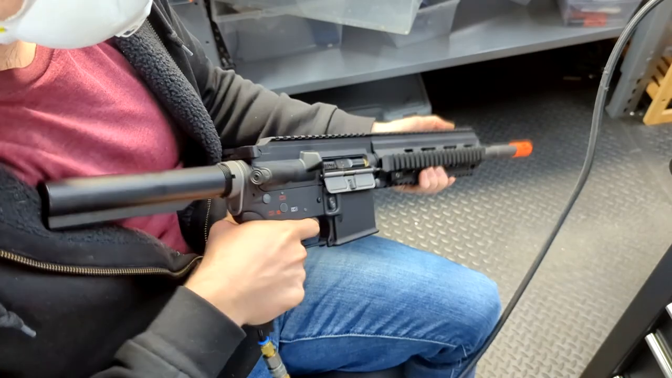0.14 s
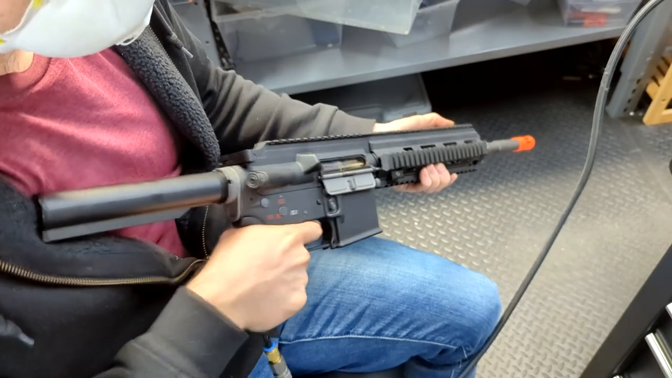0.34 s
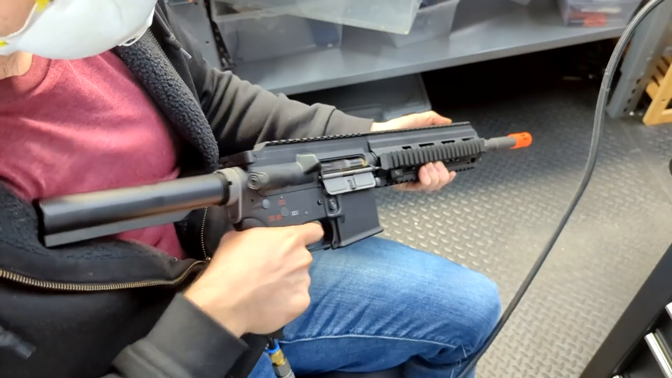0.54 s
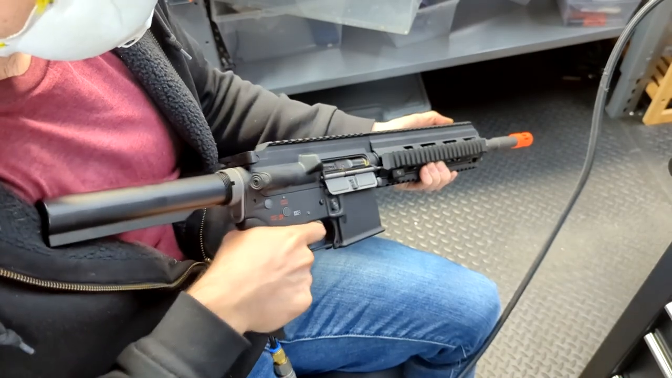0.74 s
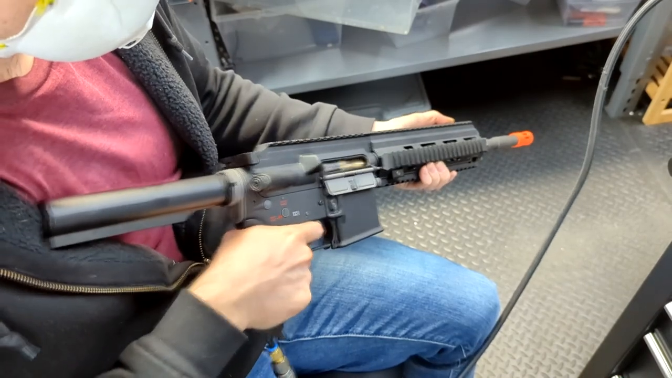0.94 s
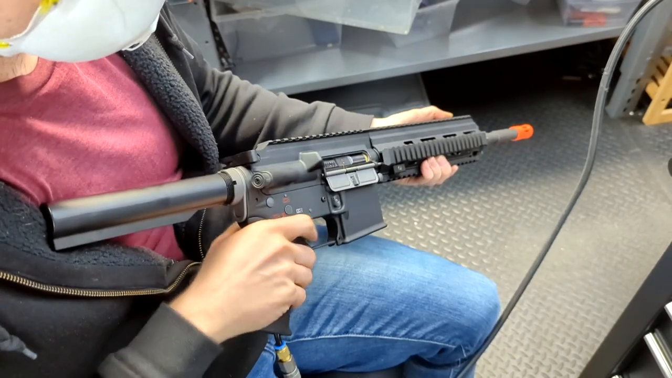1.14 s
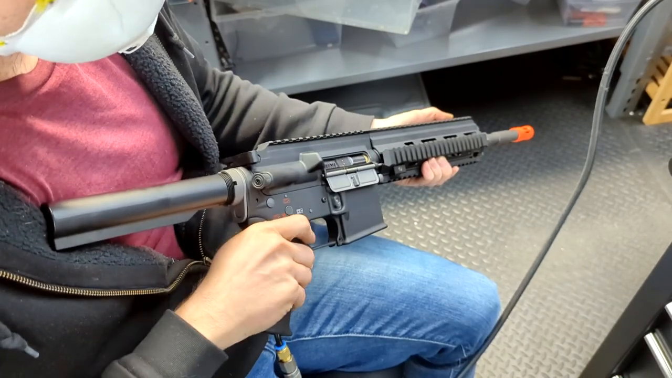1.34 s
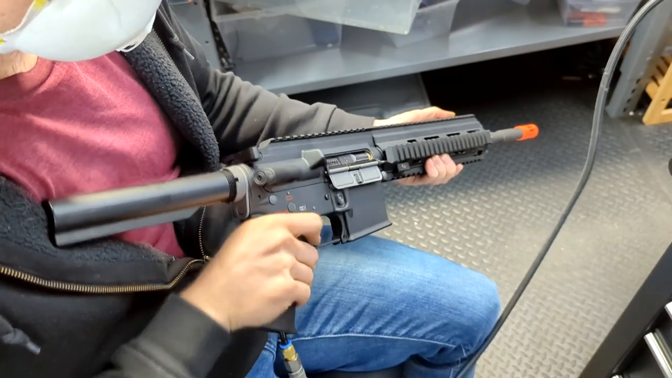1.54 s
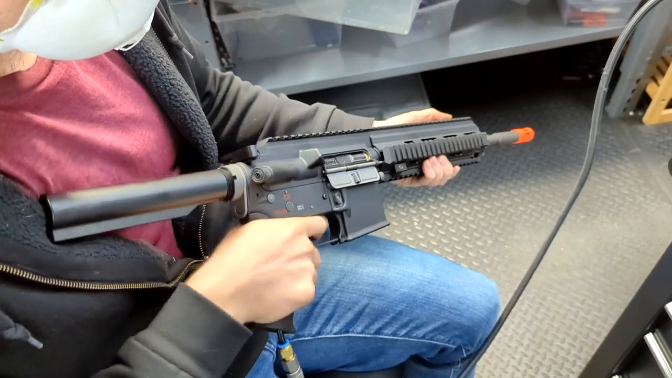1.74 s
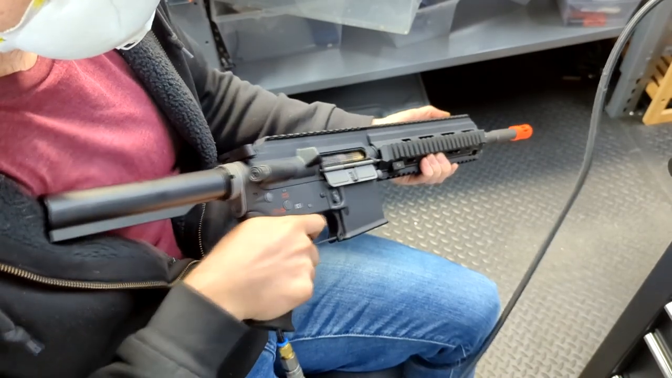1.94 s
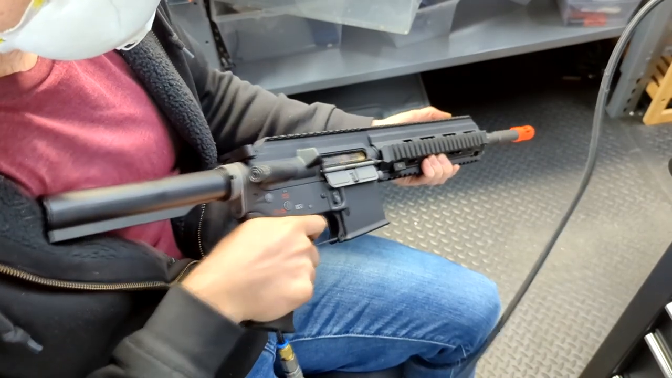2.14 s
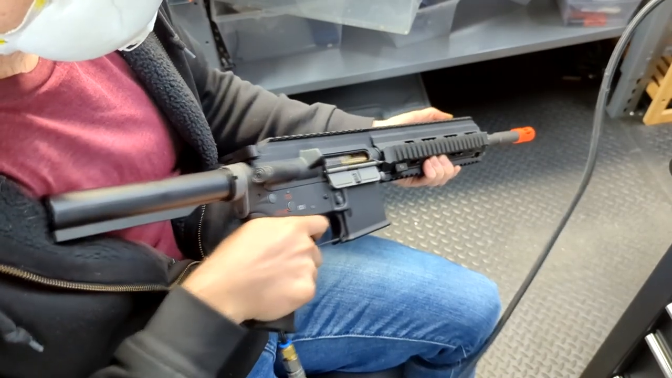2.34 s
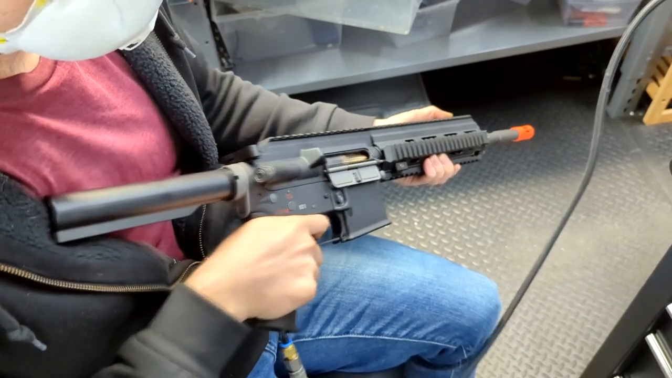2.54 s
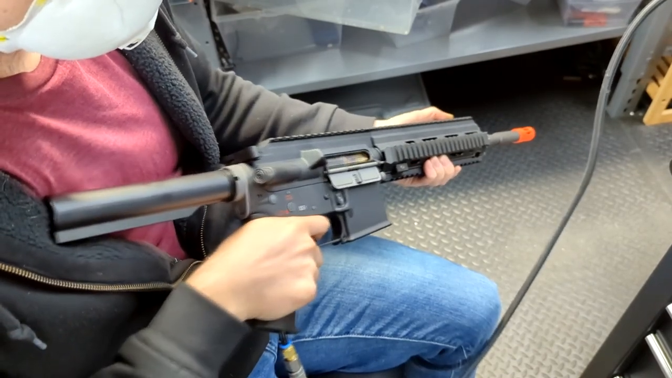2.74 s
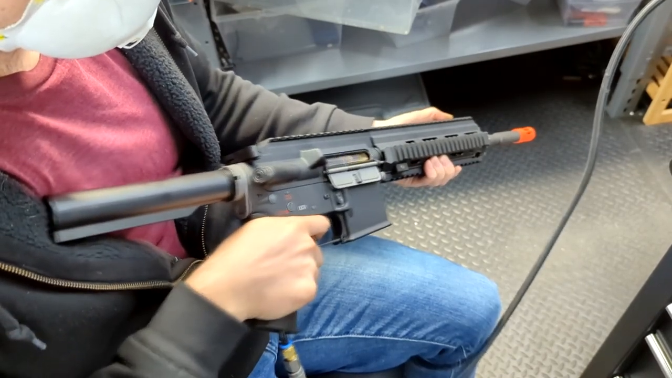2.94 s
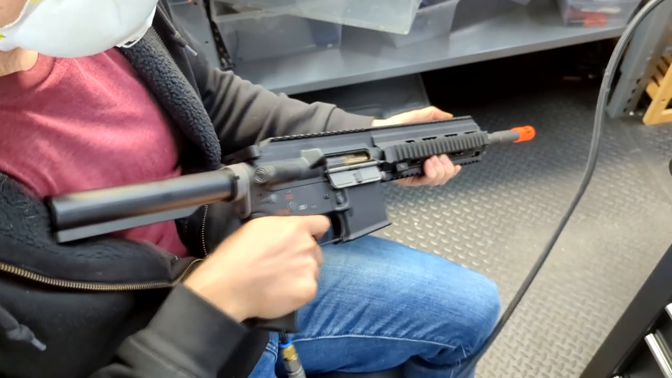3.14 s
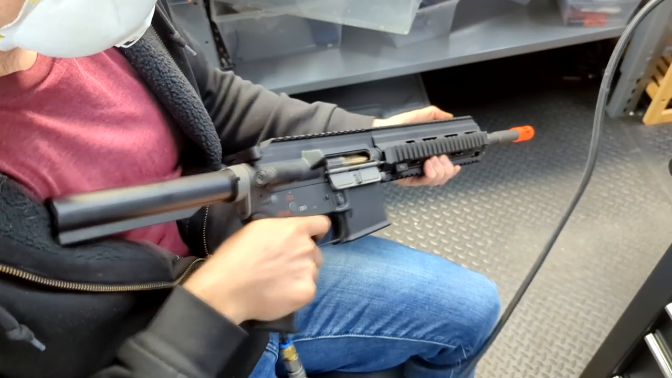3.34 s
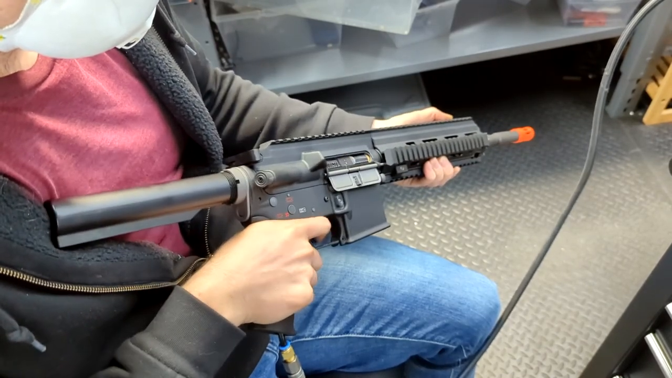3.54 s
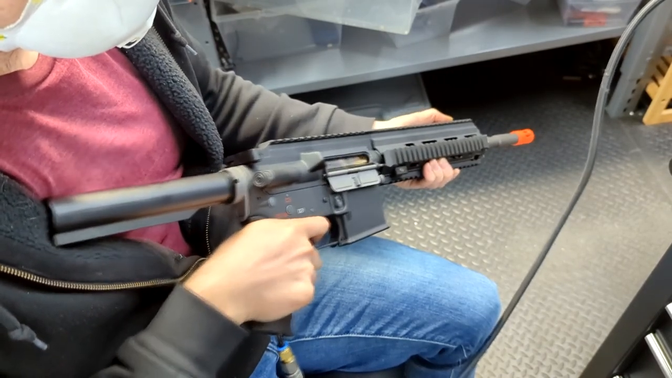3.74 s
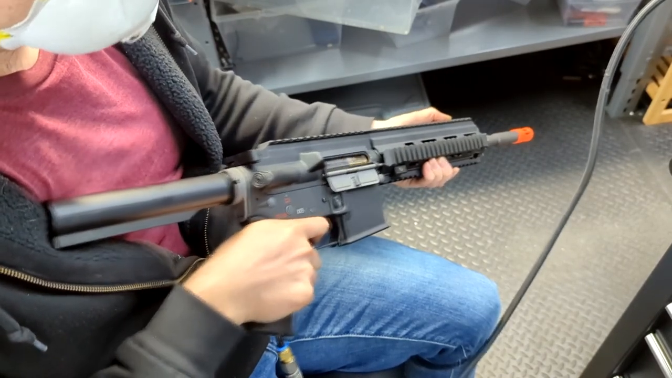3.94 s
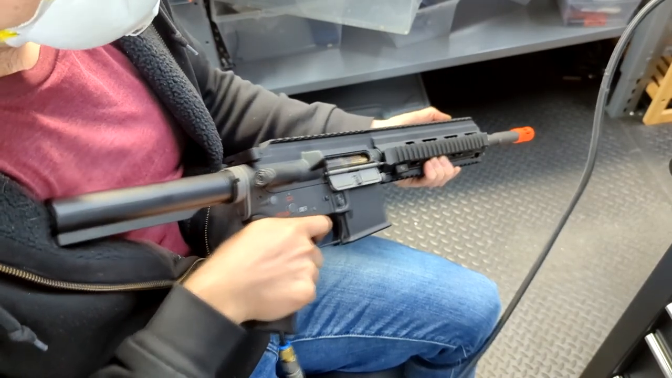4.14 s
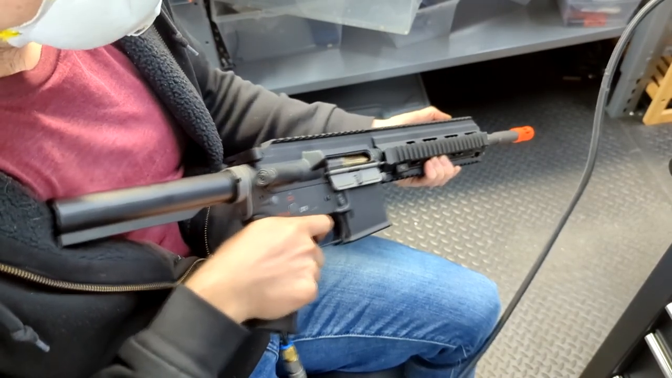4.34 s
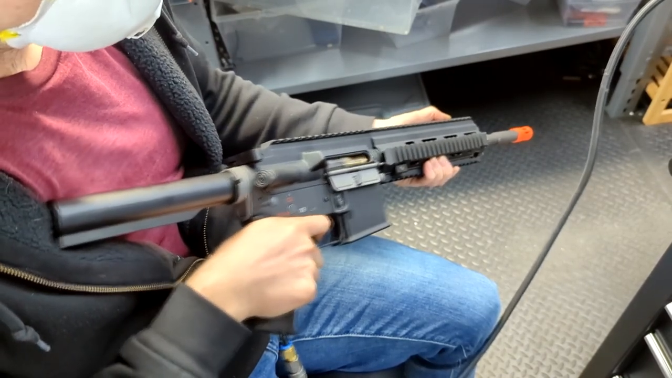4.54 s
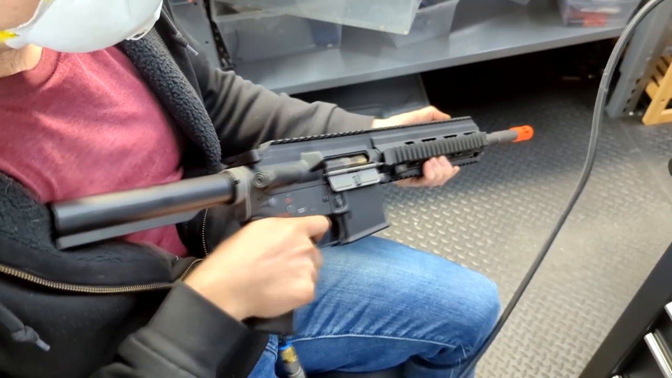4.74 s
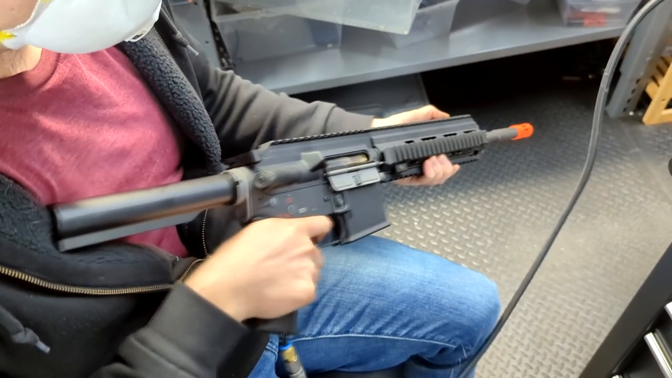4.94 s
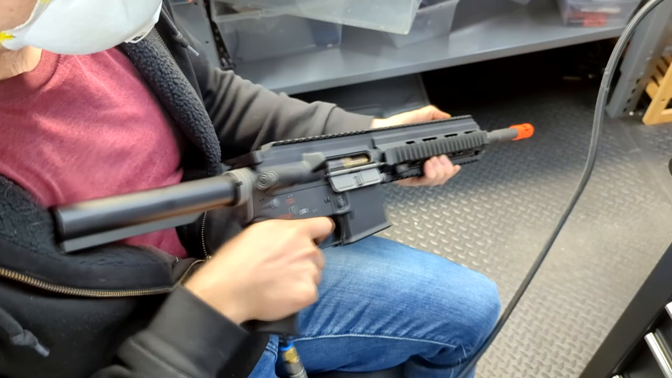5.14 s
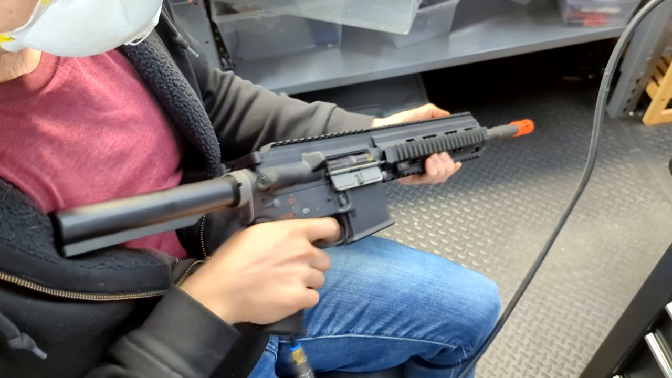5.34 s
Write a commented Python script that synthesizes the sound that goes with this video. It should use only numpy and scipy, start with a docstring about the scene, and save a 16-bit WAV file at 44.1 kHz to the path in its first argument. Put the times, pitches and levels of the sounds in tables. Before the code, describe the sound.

Close to an air-driven airsoft rifle in a hard-surfaced workshop. After faint handling bumps and a click, five evenly spaced single shots crack out, each a bright pop with metallic slap and short hiss. A pause with small selector clicks follows, then two long automatic bursts at about sixteen shots per second, separated by a short gap. Compressed stereo sound keeps the loud bursts level.

```python
"""Five single shots from an air-driven airsoft rifle in a workshop, then two long automatic bursts.
Each shot is a valve tick, a muzzle pop with near echoes, the slap of the returning nozzle and dying hiss.
Shaped noise makes the air and the room, short low swings the thump, and fading sine waves the metal ring.
Trigger, selector and valve clicks, soft bumps and a steady rumble surround the shots.
The recorder's compressor evens out loud stretches; its limiter turns down just ahead of each pop."""
import sys
import numpy as np
from scipy import signal
from scipy.fft import rfft, irfft, next_fast_len
from scipy.io import wavfile
from scipy.ndimage import uniform_filter1d, minimum_filter1d

SR = 44100
rng = np.random.default_rng(int(sys.argv[2]) if len(sys.argv) > 2 else 0)


def dump(signal):
    """Clip the signal to [-1, 1] and save it as 16-bit WAV at the path in sys.argv[1]."""
    limited = np.clip(np.atleast_2d(signal).T, -1, 1)
    pcm = np.round(limited * 32767).astype(np.int16)
    wavfile.write(sys.argv[1], SR, pcm)


N = 237758
TAIL = SR // 2  # samples in one shot, click or room answer
LEAD_S = .016  # room before the pop, so the valve tick fits in


def amp(db):
    """Turn decibels into a plain multiplier."""
    return 10 ** (np.asarray(db) / 20)


def unit(x):
    """Scale a sound to an average (RMS) level of 1."""
    return x / np.sqrt(np.mean(x ** 2) + 1e-20)


def along(points, hz):
    """Read a curve of (f/Hz, value) points, with frequency on a log axis."""
    f, v = np.transpose(points)
    return np.interp(np.log(hz + 1), np.log(f + 1), v)


def filtered(x, response):
    """Make each frequency of x louder or softer by a response curve."""
    n = x.shape[-1]
    padded = next_fast_len(n + 8192)
    spectrum = rfft(x, padded) * response(np.fft.rfftfreq(padded, 1 / SR))
    return irfft(spectrum, padded)[..., :n]


def resonances(table, hz):
    """Add up smooth peaks from rows of (f/Hz, width/Hz, level/dB)."""
    return sum(amp(db) * w * w / (w * w + 4 * (hz - centre) ** 2) for centre, w, db in table)


def add(track, s, sound):
    """Mix a sound into the track from time s, cutting it off at the track's end."""
    part = track[:, round(s * SR):][:, :sound.shape[-1]]
    part += sound[..., :part.shape[-1]]


# how alike left and right are: f/Hz, likeness (1 = the same)
LIKENESS = [(30, .6), (60, 0.85), (180, 1), (550, 0.39), (1650, 0.07), (4970, 0.01), (9000, 0.095),
            (15000, 0.085)]


def spread(pair, colour):
    """Mix two unrelated signals into a coloured left-right pair, wider where the sides are less alike."""
    def mid_and_side(hz):
        turn = np.arccos(np.clip(along(LIKENESS, hz), 0, 1)) / 2
        return colour(hz) * [np.cos(turn), np.sin(turn)]

    mid, side = np.moveaxis(filtered(pair, mid_and_side), -2, 0)
    return np.stack([mid + side, mid - side], -2)


# how long the room's main answer takes to fade by 60 dB: f/Hz, t60/s
ROOM_FADE = [(200, 0.33), (530, 0.23), (1390, 0.26), (3680, 0.3), (9700, 0.22), (15000, 0.22)]


def tails(count):
    """Room answers: each frequency dies at its own speed; far corners linger weakly."""
    noise = rng.standard_normal((count, 2, TAIL))
    hz, t, z = signal.stft(noise, SR, nperseg=128)
    fall_db = -60 * t / along(ROOM_FADE, hz)[:, None]
    lingering = amp(-22.0 + .5 * fall_db)
    return signal.istft(z * (amp(fall_db) + lingering), SR, nperseg=128)[1][..., :TAIL]


# tone of the workshop background: f/Hz, level/dB
WORKSHOP_COLOUR = [(24, -44.5), (50, -21.5), (108, -23), (165, -11.5), (195, -18), (240, -10.5),
                   (300, -13.5), (432, -15), (490, -28), (590, -14), (912, -23.5), (1300, -26.5),
                   (2160, -21.5), (3700, -35), (9000, -45.5), (15800, -49)]
# loudness of the workshop background: t/s, level/dB
WORKSHOP_LEVEL = [(0, -61.5), (.4, -64), (1.3, -63), (1.85, -65)]


def workshop():
    """Steady background rumble and hiss, made from coloured noise."""
    noise = rng.standard_normal((2, N))
    background = unit(spread(noise, lambda hz: amp(along(WORKSHOP_COLOUR, hz))))
    return amp(np.interp(np.arange(N) / SR, *np.transpose(WORKSHOP_LEVEL))) * background


# low rumble of handling: f/Hz, width/Hz, level/dB
HANDLING_PEAKS = [(88, 43, 4), (170, 18, 0)]
# loudness of the handling rumble: t/s, level/dB
HANDLING_LEVEL = [(0, -62), (.4, -58.5), (1.2, -77), (1.4, -79), (1.85, -80), (2, -70)]


def handling():
    """Low rumble of handling: noise passed through two deep resonances."""
    noise = rng.standard_normal((2, N))
    rumble = unit(spread(noise, lambda hz: resonances(HANDLING_PEAKS, hz)))
    return amp(np.interp(np.arange(N) / SR, *np.transpose(HANDLING_LEVEL))) * rumble


# soft bumps against the bench: t/s, f/Hz, level/dB, t60/s
BENCH_BUMPS = [(0.188, 89, -28, 0.09), (.2, 170, -33, .08), (.335, 85, -38, .07), (1.19, 87, -35, .08)]


def bumps():
    """Bumps against the bench: low sine waves that swell softly and die away."""
    out, t = np.zeros((2, N)), np.arange(N) / SR
    for s, hz, db, t60 in BENCH_BUMPS:
        swell = (1 - np.exp(-t / 0.018)) ** 2
        add(out, s, amp(db - 60 * t / t60) * swell * np.sin(2 * np.pi * hz * t))
    return out


# trigger, selector and valve clicks: t/s, level/dB, t60/s, low cut f/Hz
CLICK_TIMES = [(0.3565, -30, 0.063, 993), (0.3587, -29.5, 0.1, 1820), (1.474, -40, 0.021, 3500),
               (1.54, -26.5, 0.029, 6500), (1.549, -23, 0.024, 2510), (1.831, -31, 0.033, 900),
               (1.8454, -28, 0.06, 900), (3.628, -34, 0.025, 2500)]
# tone of the clicks: f/Hz, level/dB
CLICK_COLOUR = [(700, -29.5), (1500, -3.5), (2250, -10), (2800, -2.5), (3700, -1), (4600, -11), (6020, -9),
                (9600, -13), (10700, -10), (15800, -12)]


def clicks():
    """Small dry ticks of trigger, selector and valve: brief bright noise with a faint room answer."""
    out, t = np.zeros((2, N)), np.arange(TAIL) / SR
    for (s, db, t60, low_hz), tail in zip(CLICK_TIMES, tails(count=len(CLICK_TIMES))):
        dry_tick = amp(-60 * t / t60) * rng.standard_normal((2, TAIL))
        tick = (dry_tick + amp(-18) * tail) * (1 - np.exp(-t / 0.00087))
        low_cut = lambda hz: hz ** 4 / (hz ** 4 + low_hz ** 4)
        add(out, s, amp(db) * spread(tick, lambda hz: amp(along(CLICK_COLOUR, hz)) * low_cut(hz)))
    return out


# broad tone of the air blast: f/Hz, level/dB
BLAST_COLOUR = [(90, -41), (165, -11), (310, -13), (490, -16.5), (650, -12.5), (900, -14.5), (960, -28),
                (1030, -13), (1250, -9), (1420, -8.5), (1600, -7), (2610, -4.5), (3000, -6), (4300, -5.5),
                (5200, -8), (7500, -4.5), (9700, -7), (11800, -5.5), (13400, -7.5), (15800, -4)]
# rifle resonances, before the shared strength below: f/Hz, width/Hz, level/dB
RIFLE_PEAKS = [(693, 17, -13.5), (920, 45, 5), (1258, 100, -2.5), (1541, 35, 9), (1680, 27, 8),
               (1996, 47, 3.5), (2120, 100, 1), (2311, 22, 9.5), (2938, 150, 2.5), (2836, 25, 4.5),
               (3080, 20, 10), (1840, 15, 3.5), (3455, 27, 11), (3697, 49, 5), (3874, 55, 6),
               (4200, 600, -8), (10600, 20, 12), (12000, 500, -4.5)]


def blast_colour(hz):
    """Broad spectrum of the air blast, lifted at the rifle's resonances."""
    return amp(along(BLAST_COLOUR, hz)) * (1 + 0.64 * resonances(RIFLE_PEAKS, hz))


# noisy blows of a shot, in order valve, pop, floor and wall echoes, nozzle, echo:
# t/s from the pop, rise/s, t60/s, single level/dB, automatic level/dB
AIR_BLOWS = [(-.014, 0.005, 0.07, -23, -25), (0, 0.001, 0.0061, -1, -4), (.003, 0.00083, 0.037, -12, -18),
             (0.0105, 0.002, 0.02, -13, -11), (0.0222, .001, 0.02, -2, -4), (0.031, 0.0015, 0.03, -7, -5),
             (0.042, 0.00051, 0.014, -6.5, -7)]
# part of the hiss power that is alike in every shot: f/Hz, share (0 to 1)
SAME_EACH_SHOT = [(300, 1), (700, 1), (1500, 0.48), (4000, 0.13), (9000, 0.018)]
# brightness curve, used 1.5 times for single shots and 0.5 times for automatic: f/Hz, level/dB
BRIGHTNESS = [(160, -1.5), (300, -0.5), (600, 0.5), (900, 2.5), (1500, -1.5), (3500, -1.5), (6500, 1),
              (11000, -1.5), (15000, -4)]
# left minus right: f/Hz, level/dB
LEFT_RIGHT = [(60, -4), (180, -0.5), (550, 0.8), (1650, -2), (4970, -3.5), (9000, 2), (15000, -0.5)]
BLOWS_TOP_HZ = 7400  # the blows are duller than the venting hiss


def blast(mode, count):
    """Air blows and room hiss, partly new and partly the same from shot to shot."""
    t = np.arange(TAIL) / SR - LEAD_S
    since = lambda delay: np.maximum(t - delay, 0)
    power = np.zeros(TAIL)
    for delay, rise, t60, *db in AIR_BLOWS:
        fade = amp(2 * (db[mode] - 60 * since(delay) / t60))
        power += fade * (1 - np.exp(-since(delay) / rise))
    # one extra blast supplies the part shared by all shots
    hiss = np.sqrt(power) * rng.standard_normal((count + 1, 2, TAIL))
    hiss = filtered(hiss, lambda hz: 1 / np.sqrt(1 + (hz / BLOWS_TOP_HZ) ** 2))
    # the room fills over the first reflections while the barrel keeps venting
    swell = 1 - np.exp(-since(.002) / 0.022)
    hiss += amp(-4.0) * swell * np.roll(tails(count=count + 1), round(LEAD_S * SR), -1)
    # separate reflections and rattling parts arrive as sharp grains, not as even hiss
    grains = uniform_filter1d(rng.standard_normal((count + 1, 1, TAIL)), round(0.00046 * SR))
    hiss *= amp(1.72 * unit(grains) - 1.5)
    share = lambda hz: np.clip(along(SAME_EACH_SHOT, hz), 0, 1)
    new = filtered(hiss[1:], lambda hz: np.sqrt(1 - share(hz)))
    same = filtered(hiss[0], lambda hz: np.sqrt(share(hz)))
    bright = lambda hz: amp((1.5 - mode) * along(BRIGHTNESS, hz))
    stereo = spread(new + same, lambda hz: blast_colour(hz) * bright(hz))
    return filtered(stereo, lambda hz: amp(np.outer([.5, -.5], along(LEFT_RIGHT, hz))))


# low pressure swings, pop with echoes and then the nozzle:
# t/s from the pop, width/ms, single level/dB, automatic level/dB
PRESSURE_SWINGS = [(.0012, .5, -15, -13), (.0042, .68, -7, -7.5), (.0087, .74, -5, -6.5),
                   (.0171, .6, -15, -17), (.0211, .6, -16, -17), (.0367, .5, -12, -10),
                   (.0402, .5, -24, -16), (.0441, .56, -19, -4.5), (.0471, .47, -24, -12),
                   (.0507, .5, -26, -13), (.0543, .52, -26, -10.5)]
BASS_CUT_HZ, THUMP_TOP_HZ = 190, 430
SWING_SCATTER_DB = 1.2
RECOIL_MS, RECOIL_DB, RECOIL_SCATTER_DB = 1.3, -28, 1.5


def thump(mode):
    """Low pressure swings at the same moments in every shot, each at a new strength."""
    t = np.arange(TAIL) / SR - LEAD_S
    swing = lambda u: -u * np.exp(-u * u / 2)
    out = np.zeros(TAIL)
    for delay, ms, *db in PRESSURE_SWINGS:
        strength = amp(db[mode] + SWING_SCATTER_DB * rng.standard_normal())
        out += strength * swing((t - delay) * 1000 / ms)
    # the thump carries almost no deep bass
    bass_cut = lambda hz: hz ** 4 / (hz ** 4 + BASS_CUT_HZ ** 4)
    out = filtered(out, lambda hz: bass_cut(hz) / (1 + (hz / THUMP_TOP_HZ) ** 4))
    # a deep, soft kick through stock and hands
    kick = amp(RECOIL_DB + RECOIL_SCATTER_DB * rng.standard_normal())
    out += kick * swing((t - .0097) * 1000 / RECOIL_MS)
    return amp([[-.6], [.6]]) * out  # left, right


# rings of the rifle's receiver, from the pop to the nozzle's return:
# t/s from the pop, f/Hz, t60/s, single level/dB, automatic level/dB
RECEIVER_RINGS = [(.0336, 770, .01, 5, 5), (.0422, 880, .011, -1, 0), (.0472, 600, .016, -20, -3),
                  (.0515, 800, .016, -20, -8), (.0352, 2600, .012, -10, -3), (.0295, 2200, .014, 1, -12),
                  (.0297, 3500, .012, 2, -6), (.0418, 3300, .012, -8, 7), (.0421, 4100, .012, -10, 5),
                  (.0418, 1900, .016, -3, 4), (.019, 1900, .01, -1, -1), (.018, 3100, .012, 1, -1),
                  (.0192, 870, .012, -11, -12), (-.0005, 870, .01, -8, -6), (.004, 610, .014, -16, -4),
                  (-.0003, 1900, .007, 2, 5), (-.0003, 3400, .006, 0, 2)]
BEND_PER_KHZ = .02  # higher rings wander more in pitch from shot to shot
# rings after NOZZLE_S shift together, a little early or late (single, automatic)
NOZZLE_S, NOZZLE_SLIP_S = .025, (.00005, .0003)


def slap(mode):
    """Receiver ring: fading sine waves at new strengths and slightly new pitches in each shot."""
    out, t = np.zeros((2, TAIL)), np.arange(TAIL // 8) / SR
    late = NOZZLE_SLIP_S[mode] * rng.standard_normal()
    for delay, hz, t60, *db in RECEIVER_RINGS:
        size, bend = rng.standard_normal(2)
        pitch = hz * (1 + BEND_PER_KHZ * hz / 1000 * bend)
        ring = (1 - np.exp(-t / .0006)) * np.sin(2 * np.pi * pitch * t)
        start = LEAD_S + delay + late * (delay > NOZZLE_S)
        add(out, start, amp(db[mode] + 1.2 * size - 60 * t / t60) * ring)
    return amp([[-1.5], [1.5]]) * out  # left, right


# automatic bursts: first shot t/s, number of shots, cycle times/ms at even steps through the burst
AUTO_BURSTS = [(1.8631, 26, [61.71, 61.71]), (3.6666, 28, [61.95, 62.4, 61.98, 61.75])]
JITTER_S = .00015
AUTO_THUMP_DB, THUMP_SCATTER_DB = -4, 1.4
AUTO_HISS_DB, HISS_SCATTER_DB = 6.5, 2


def automatic():
    """Shot rows (t/s, thump/dB, hiss/dB): the valve timer repeats its cycle, drifting a little."""
    times = []
    for first, count, cycle_ms in AUTO_BURSTS:
        progress = np.linspace(0, 1, count - 1)
        gaps = np.interp(progress, np.linspace(0, 1, len(cycle_ms)), cycle_ms) / 1000
        times += list(first + np.cumsum(np.append(0, gaps)))
    jitter, thump_size, hiss_size = rng.standard_normal((3, len(times)))
    return np.transpose([times + JITTER_S * jitter,
                         AUTO_THUMP_DB + THUMP_SCATTER_DB * thump_size,
                         AUTO_HISS_DB + HISS_SCATTER_DB * hiss_size])


# single shots: t/s, thump and hiss trims as level/dB
SINGLE_SHOTS = [(0.3891, 0, 7), (0.5539, -1, 7), (0.7028, -0.5, 6.5), (0.8518, -3.5, 6.5),
                (1.0012, -3.5, 8)]


def rifle():
    """Five single shots (mode 0), then automatic fire (mode 1), each a thump, a slap and an air blast."""
    out = np.zeros((2, N))
    for mode, shots in enumerate([SINGLE_SHOTS, automatic()]):
        for (s, thump_db, hiss_db), hiss in zip(shots, blast(mode, count=len(shots))):
            shot = amp(thump_db - 6.0) * thump(mode)
            shot += amp(-18.5) * slap(mode)
            shot += amp(hiss_db) * hiss
            add(out, s - LEAD_S, shot)
    return out


def scene():
    """Mix the background, the small noises and the rifle."""
    return workshop() + handling() + bumps() + clicks() + rifle()


def needed(dry, window, knee_db, slope):
    """Gain in dB that squeezes the running level above a knee."""
    level = np.sqrt(np.abs(uniform_filter1d(np.mean(dry ** 2, 0), round(window * SR))))
    return -slope * np.maximum(20 * np.log10(level + 1e-9) - knee_db, 0)


MIC_LOW_HZ, TOP_HZ, EDGE_HZ = 45, 15950, 250


def record(dry):
    """A smooth compressor, a look-ahead limiter for the pops, then the bass cut and band limit."""
    slow_db = needed(dry, 0.0075, knee_db=-25.5, slope=0.81)
    slow_db = uniform_filter1d(slow_db, round(0.035 * SR))
    squeezed = amp(slow_db + 1.5) * dry
    ahead, hold = round(.008 * SR), round(.004 * SR)
    limit_db = needed(squeezed, 0.00034, knee_db=-17.5, slope=1.0)
    held = minimum_filter1d(limit_db, ahead + hold, origin=(hold - ahead) // 2)
    fast_db = uniform_filter1d(held, round(.005 * SR))
    # the gain returns along a one-pole release
    k = np.exp(-1 / (0.0085 * SR))
    fast_db = np.minimum(fast_db, signal.lfilter([1 - k], [1, -k], fast_db))
    bass_cut = lambda hz: hz ** 2 / (hz ** 2 + MIC_LOW_HZ ** 2)
    top_cut = lambda hz: np.clip((TOP_HZ - hz) / EDGE_HZ, 0, 1) ** 2
    return filtered(amp(fast_db) * squeezed, lambda hz: bass_cut(hz) * top_cut(hz))


dry = scene()
out = record(dry)
dump(out)
```